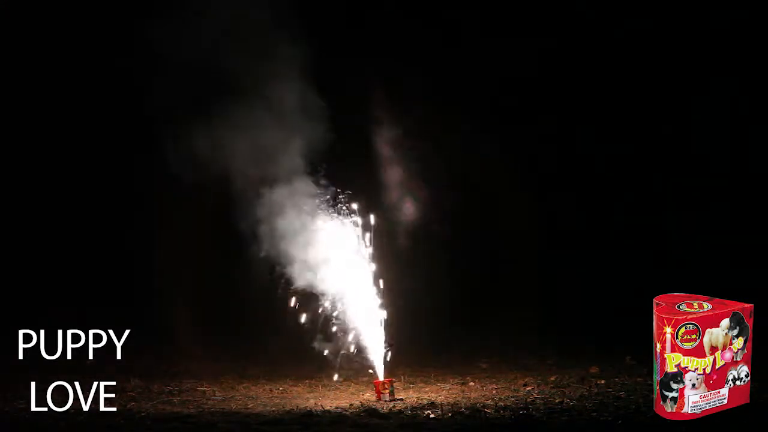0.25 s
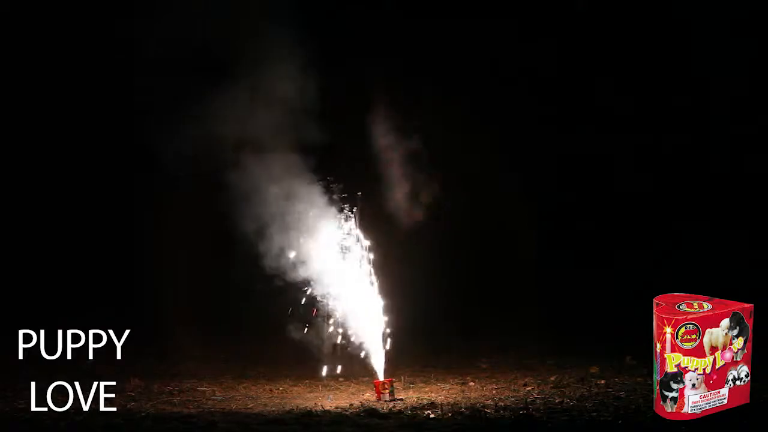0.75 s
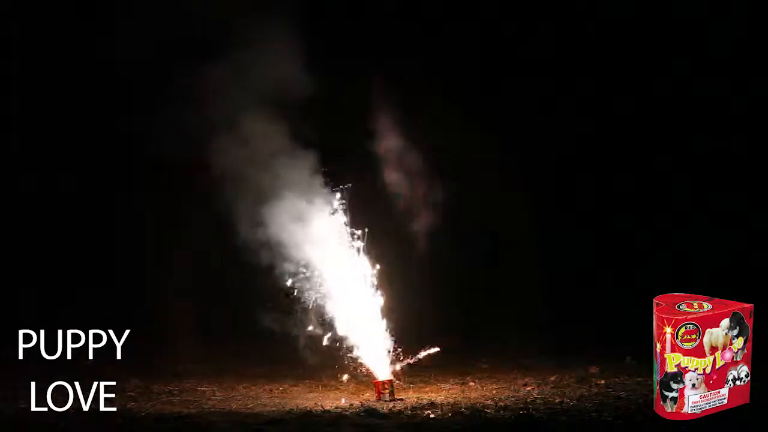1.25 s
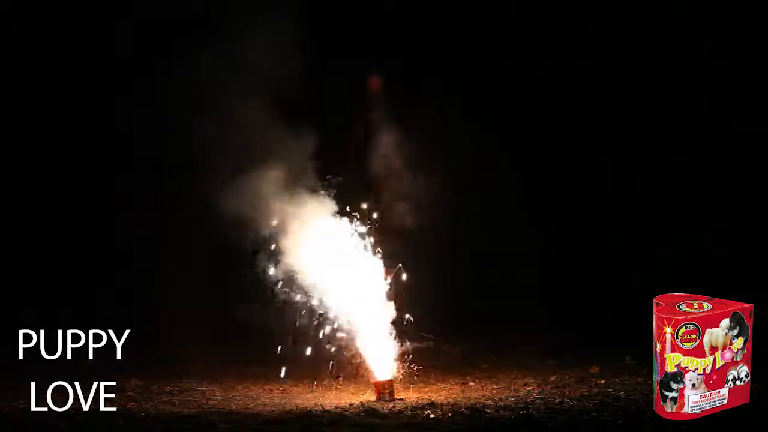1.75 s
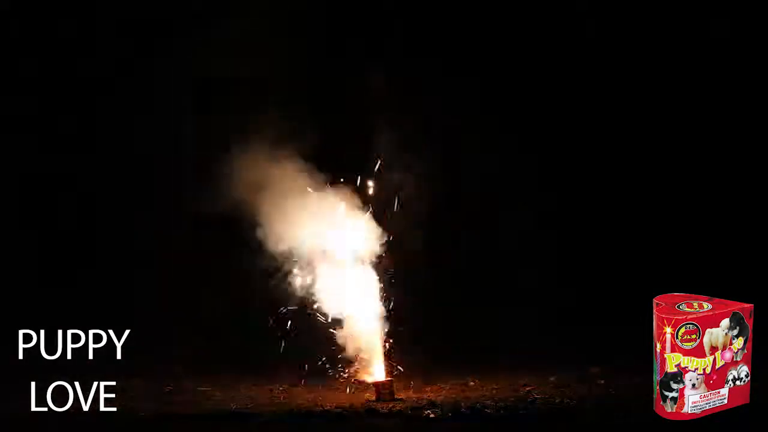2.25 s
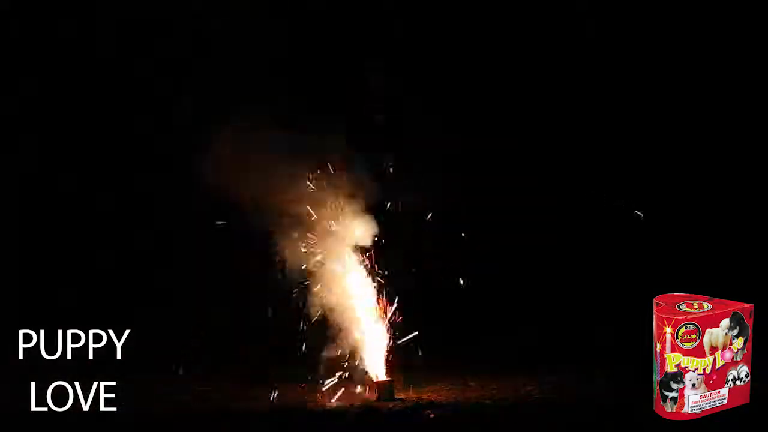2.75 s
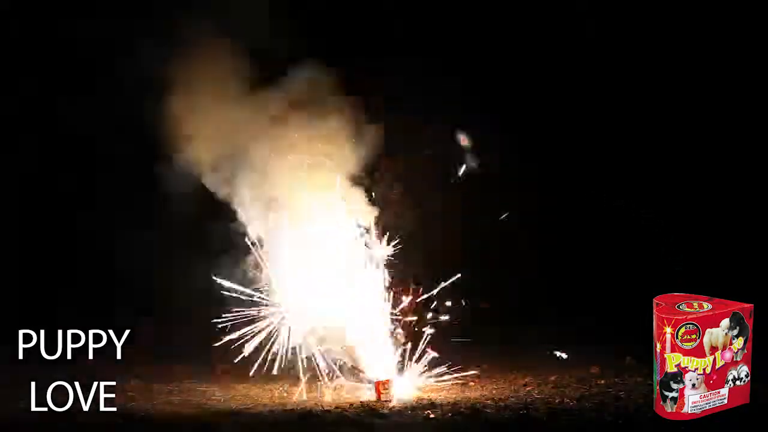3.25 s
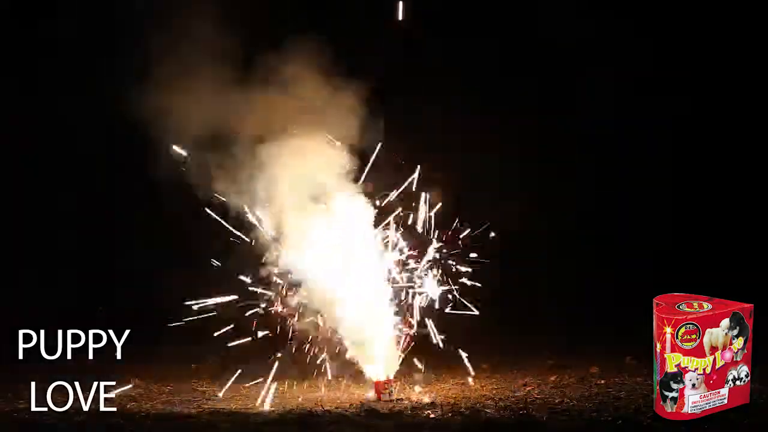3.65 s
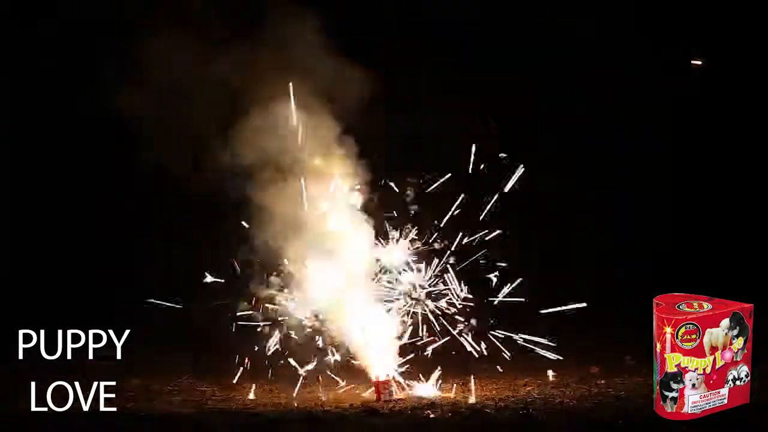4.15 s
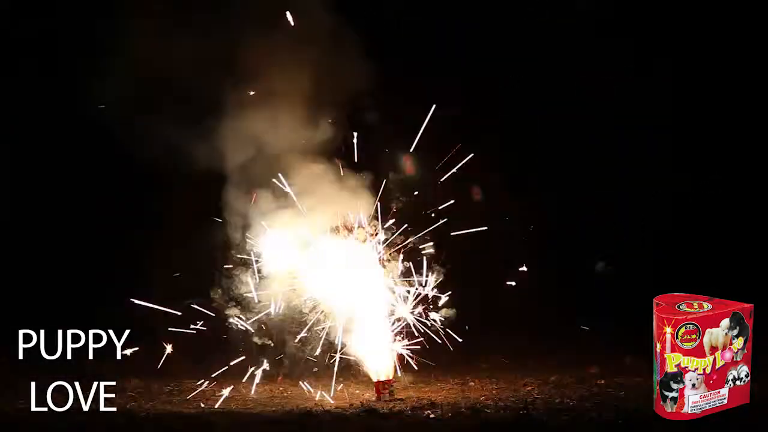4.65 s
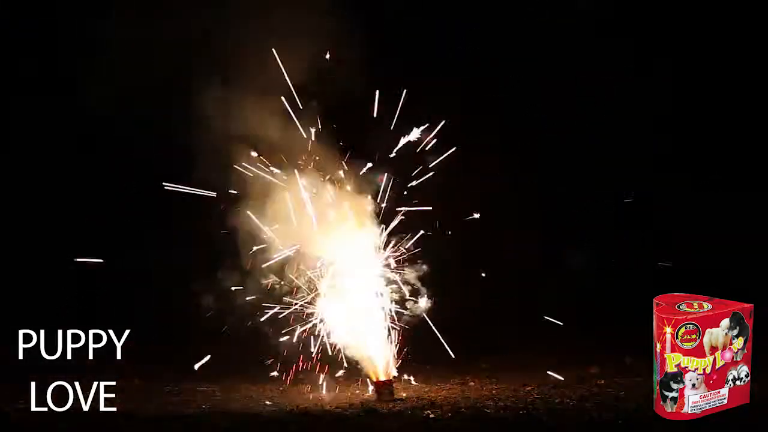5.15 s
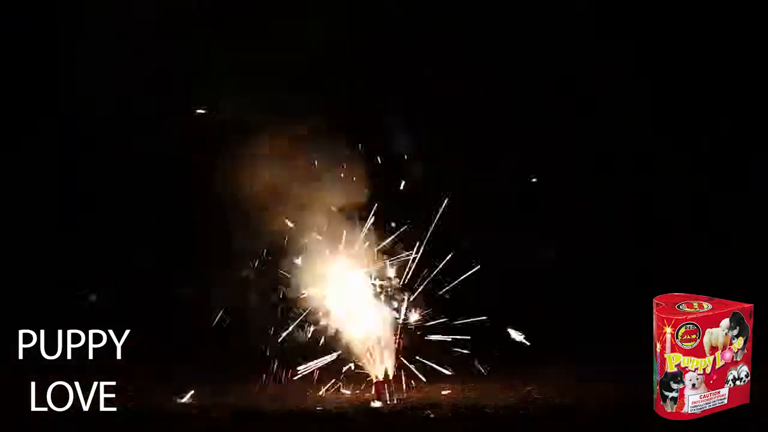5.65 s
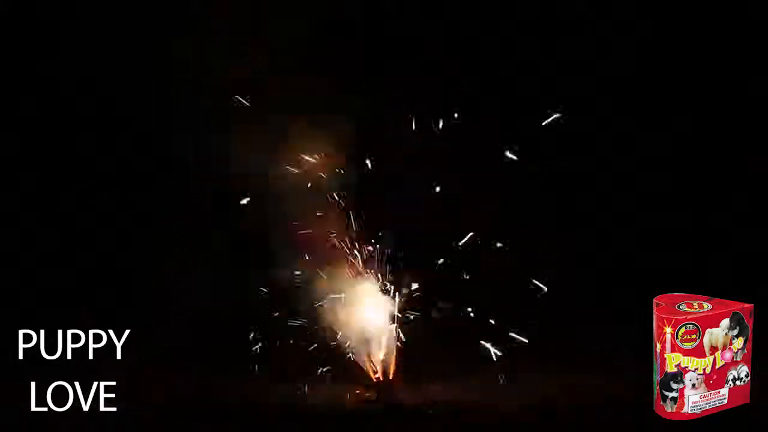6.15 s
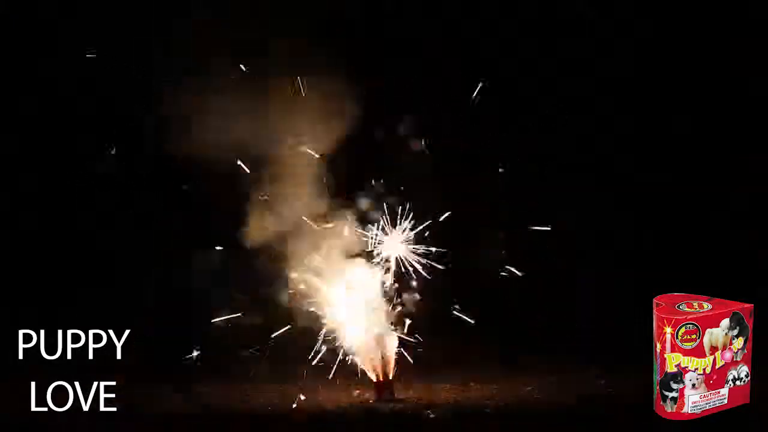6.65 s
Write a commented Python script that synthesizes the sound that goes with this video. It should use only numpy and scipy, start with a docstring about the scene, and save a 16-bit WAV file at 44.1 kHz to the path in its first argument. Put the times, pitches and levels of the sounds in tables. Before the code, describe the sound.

From 0 to 1 second a ground fountain firework hisses steadily, mid-bright and slightly uneven, above a faint low flame roar. At about 1.05 a loud, shrill, raspy whistle starts abruptly near 3.3 kHz and slides down below 2.9 kHz, fading out by 2.3 while the hiss nearly vanishes. Two sharp cracks snap at 2.4. A second whistle swells in at 2.6, around 2.9 kHz, falling to about 2.4 kHz and fading by 4.1; from 3 seconds pops and tiny ticking sparks thicken quickly. From 4.2 the crackle is dense and loud, dry bright snaps in irregular clusters. A quieter third whistle, settling near 2 kHz, runs from 4.5 to 5.37 and ends in a tiny high squeak. Crackling continues unevenly to 6.9. Open outdoor space, short gritty rustles and faint echoes, close microphone clipping slightly on peaks.

```python
"""Fountain firework with whistles and crackle

A fountain firework burns on open ground at night. Three whistle tubes sound in turn, each a sine wave
with overtones that falls in pitch as it burns down; the last dies with a squeak.
Granules burst in the spray as short pulses, each sharp crack followed by its bounce off the ground.
Coloured noise makes the nozzle's hiss and the low flame roar; decaying noise makes the faint echoes.
"""
import sys
import numpy as np
from scipy import signal
from scipy.fft import rfft, irfft, next_fast_len
from scipy.io import wavfile

SR = 44100
rng = np.random.default_rng(int(sys.argv[2]) if len(sys.argv) > 2 else 0)


def wav_out(sig):
    """Save sig, one row per channel (or a flat mono array), as 16-bit PCM at SR to the path in sys.argv[1]."""
    wavfile.write(sys.argv[1], SR, np.round(np.clip(np.atleast_2d(sig).T, -1, 1) * 32767).astype(np.int16))


N = 305172
TIME = np.arange(N) / SR   # seconds

# colour of a crack and of its rustle on the ground: f/Hz, relative level/dB
CRACK_SPECTRUM = [(40, -38.5), (130, -17.5), (290, -13), (430, -15.5), (900, -0.5), (1400, 1), (2600, -2.5),
                  (4300, 0.5), (6200, -5.5), (7500, -9.5), (9200, -18.5), (12500, -18), (16000, -24.5)]


def whistle(start, end, pitch_hz, sag, excess_hz, settle_s, level_db, swell_db, attack_s, burnout_s,
            bend_hz, left, overtone_db, wobble,
            flutter=0.0017, jitter=0.0032, waver_db=0.81, steepening=0.46, rasp_db=2.5):
    """Pulsing combustion drives a pipe whose pitch settles and sags; the harder it burns, the richer its overtones."""
    # overtones at full blast, before each tube's own shift: f/Hz, level against the fundamental/dB
    overtone_spectrum = [(4100, -7), (5000, -13.5), (6100, -20), (7500, -27.5), (9200, -46), (10500, -40.5),
                         (12300, -40.5), (15000, -51.5)]
    chirp_share, chirp_s = .12, .005   # upward flick in pitch at an abrupt start or end
    snuff_s = 0.0071   # the flame goes out
    # a tube that catches abruptly shakes in level and pitch at first
    sputter_db, sputter_share, sputter_s = 4, .012, .025

    on = (TIME > start) & (TIME < end)
    t, to_go = TIME[on] - start, end - TIME[on]
    burnout = np.clip(1 - to_go / burnout_s, 0, 1)   # rises to 1 at the end
    unsettled = np.exp(-t / settle_s)
    abrupt = min(chirp_s / attack_s, 1)
    sputter = abrupt * np.exp(-t / sputter_s) * drift(150)[on]

    flick = abrupt * np.exp(-t / chirp_s) + 2 * left * np.exp(-to_go / chirp_s)
    chirp = sputter_share * sputter + chirp_share * flick
    hz = pitch_hz * (1 - sag * t + chirp) + excess_hz * unsettled + bend_hz * burnout
    # slow to fast unsteadiness, as shares of the pitch
    shake = wobble * unsettled * drift(24)[on] + flutter * drift(68)[on] + jitter * drift(870)[on]
    phase = 2 * np.pi * np.cumsum(hz * (1 + shake)) / SR

    fade_in = np.minimum(t / attack_s, 1)
    fade_down = 1 - (1 - np.clip(left, 0, 1)) * burnout
    envelope = fade_in * fade_down * np.minimum(to_go / snuff_s, 1)
    db = level_db + swell_db * t + 20 * np.log10(envelope + 1e-9)

    blast = from_db(overtone_db + steepening * (db - db.max()))
    rasp = rasp_db * drift(120)[on]   # uneven burning shakes the high overtones most
    wave = np.sin(phase)
    for k in range(2, 8):
        audible = k * hz < SR / 2   # leave out what the sample rate cannot hold
        strength = blast * from_db(np.log(k / 2) * rasp) * gain_at(overtone_spectrum, k * hz)
        wave += audible * strength * np.cos(k * phase)

    out = np.zeros(N)
    out[on] = np.sqrt(2) * wave * from_db(db + waver_db * drift(30)[on] + sputter_db * sputter)
    return out


def crackle(sharp_db=2.5, dull_db=3.0, big_db=-8, chance_db=5, dull_hz=7000):
    """Granules burst sharp or dull; big ones tend to push out the longer, duller pulse."""
    s, db = granules()
    dull = db + chance_db * luck(s) > big_db
    soften = signal.butter(1, dull_hz, fs=SR, output="sos")
    dull_cracks = signal.sosfilt(soften, cracks(s[dull], db[dull] + dull_db))
    return dull_cracks + cracks(s[~dull], db[~dull] + sharp_db)


def granules():
    """Times and levels of all bursts: placed ones, and random ones that go off alone or just after a placed one."""
    # bursts placed one by one, most of them loud: t/s, level before the sharp or dull boost/dB
    placed_bursts = [(2.3818, -3.5), (2.3841, -7.5), (2.4422, -3.5), (2.71, -17.5), (2.8135, -16.5),
                     (2.9604, -5), (2.968, -7.5), (3.0539, -14.5), (3.1238, -6), (3.221, -9.5),
                     (3.3277, -4), (3.351, -7.5), (3.4863, -4.5), (3.588, -8.5), (3.6306, -6),
                     (3.6402, -15), (3.6936, -7), (3.7621, -8.5), (3.8369, -6), (3.8949, -4.5),
                     (3.9838, -10), (4.098, -13.5), (4.144, -6.5), (4.167, -3.5), (4.211, -6.5),
                     (4.254, -9), (4.2884, -4.5), (4.3141, -13), (4.3327, -3.5), (4.4105, -4.5), (4.422, 0),
                     (4.4509, -6), (4.458, -6), (4.4832, -5), (4.5367, -3), (4.5731, -7), (4.6427, -4),
                     (4.7034, -5.5), (4.7504, -0.5), (4.8587, -5), (4.9024, -11), (4.9962, -4), (5.055, -6),
                     (5.0758, -8), (5.1197, -25), (5.1618, -12), (5.2204, -0.5), (5.294, -2.5),
                     (5.3181, -6), (5.3379, -6.5), (5.4222, -6), (5.467, -1), (5.4837, -6), (5.4994, -9),
                     (5.5699, -13.5), (5.6069, -5.5), (5.6193, -5.5), (5.6723, -9), (5.715, -4),
                     (5.7807, -7.5), (5.8141, -7.5), (5.8215, -2), (5.9101, -1), (5.9189, -0.5),
                     (6.0029, -8.5), (6.045, -15), (6.0999, -7.5), (6.1062, -10), (6.1394, -5.5),
                     (6.26, -9.5), (6.2757, -4.5), (6.3202, -5), (6.3334, -7), (6.3497, -5), (6.3623, -3.5),
                     (6.3728, -7), (6.3952, -5.5), (6.412, -10), (6.4242, -10), (6.4574, -4), (6.486, -7.5),
                     (6.5735, -8.5), (6.6112, -3.5), (6.6152, -3), (6.64, -5.5), (6.7006, -16),
                     (6.7436, -6.5), (6.7692, -8), (6.7901, -9.5), (6.8058, -5), (6.8578, -3.5),
                     (6.9087, -8)]
    # random bursts: t/s, lone cracks per second/(1/s) (below 0 means none), cracks set off by each placed burst/count
    random_rates = [(2.9, -5, 0), (3.2, 17, 0.19), (3.7, 40, 0.64), (4.2, 17, 1.2), (5.1, 28.5, 1.5),
                    (5.6, 8, 1.6), (6.92, 0, 1)]
    random_level_db, spread_db = -13.5, 2.5   # level before the same boost, and its scatter
    chain_s = .013   # mean wait between a placed burst and the neighbours that it sets off

    s, db = np.transpose(placed_bursts)
    lone_per_s, set_off = in_time(random_rates)
    r = np.exp(-1 / (chain_s * SR))
    chain = signal.lfilter([1 - r], [1, -r], clicks(s, np.ones(len(s))) + 1e-18)
    born = rng.random(N) < lone_per_s / SR + set_off * chain
    random_db = random_level_db + spread_db * np.clip(rng.standard_normal(N), -2, 2)
    return np.append(s, TIME[born]), np.append(db, random_db[born])


def sparks(spread_db=5):
    """Tiny sparks tick at random throughout the spray."""
    # small sparks: t/s, ticks per second/(1/s), middle level of a tick/dB
    spray = [(1.1, 18, -46), (2.5, 24, -42), (3.4, 100, -21), (5.3, 76, -15), (5.6, 69, -29.5)]
    per_s, db = in_time(spray)
    born = rng.random(N) < per_s / SR
    return cracks(TIME[born], db[born] + spread_db * np.clip(luck(TIME[born]), -2, 2))


def cracks(times, db, bounce=.4, lag_s=.00052, lag_spread=.35):
    """Each crack is followed by its bounce off the ground, the later the higher it bursts."""
    lags = lag_s * np.exp(lag_spread * luck(times))   # random heights
    bursts = clicks(times, from_db(db)) + clicks(times + lags, bounce * from_db(db))
    return signal.oaconvolve(bursts, shock(CRACK_SPECTRUM))[:N]


def shock(spectrum, size=1024):
    """The most abrupt pulse with this spectrum that does not start before its cause; height 1."""
    # folding the cepstrum (spectrum of the log spectrum) packs the energy at the front
    cepstrum = irfft(np.log(gain_at(spectrum, np.fft.rfftfreq(size, 1 / SR))))
    cepstrum[1:size // 2] *= 2
    cepstrum[size // 2 + 1:] = 0
    pulse = notch(irfft(np.exp(rfft(cepstrum))))
    return pulse / pulse.max()


def afterglow(pops, level_db, t60):
    """Rough ground scatters each pop into a dying rustle: fresh noise that follows the pops' power."""
    r = from_db(-120 / (t60 * SR))   # power falls by 60 dB in t60 seconds
    power = signal.lfilter([1 - r], [1, -r], pops ** 2 + 1e-18)
    return from_db(level_db) * np.sqrt(power) * notch(noise(CRACK_SPECTRUM))


def nozzle():
    """The jet hisses unevenly above the roar of the flame; both are coloured noise."""
    # loudness of the gas jet: t/s, hiss level/dB
    jet_level = [(0, -32.5), (.8, -32.5), (.97, -35.5), (1.05, -28), (1.09, -55), (2.24, -49), (2.33, -58),
                 (2.47, -60), (2.55, -49), (3.5, -66), (5.3, -41), (5.55, -56), (6.2, -66)]
    # loudness of the flame: t/s, roar level/dB
    flame_level = [(0, -42), (1.07, -39), (1.13, -64.5), (2.4, -59), (3.5, -57), (6.92, -66.5)]
    # colour of the hiss: f/Hz, relative level/dB
    hiss_spectrum = [(200, -28), (500, -12), (1400, -5.5), (2800, -4.5), (3900, -0.5), (4900, -4.5),
                     (6200, -11), (7500, -17.5), (9000, -26.5), (12500, -27), (16000, -32)]
    # colour of the roar: f/Hz, relative level/dB
    roar_spectrum = [(25, -30.5), (60, -15.5), (140, -3), (310, -0.5), (420, -6.5), (600, -22),
                     (3000, -68.5)]
    sputter_db, lump_db = 1.1, .8   # unevenness of hiss and roar
    hiss_db = in_time(jet_level)[0] + sputter_db * drift(48)
    roar_db = in_time(flame_level)[0] + lump_db * drift(40)
    hiss = from_db(hiss_db) * notch(noise(hiss_spectrum))
    roar = from_db(roar_db) * noise(roar_spectrum)
    return hiss + roar


def surroundings(x):
    """A wall a few metres off and the yard around answer faintly."""
    wall = scatter(x, level_db=-24, delay_s=.02, t60=.02)
    yard = scatter(x, level_db=-23.5, delay_s=0.018, t60=0.24)
    return wall + yard


def scatter(x, level_db, delay_s, t60):
    """Diffuse reflection from a rough surface: late and dying away by 60 dB in t60 seconds."""
    t = TIME[:SR] - delay_s
    response = rng.standard_normal(SR) * (t > 0) * from_db(-60 * np.abs(t) / t60)
    response = response / np.sqrt(np.sum(response ** 2))   # total energy 1
    return from_db(level_db) * signal.oaconvolve(x, response)[:N]


def noise(spectrum):
    """Turbulence of a given colour; rms 1."""
    size = next_fast_len(N)
    white = rfft(rng.standard_normal(size))
    coloured = white * gain_at(spectrum, np.fft.rfftfreq(size, 1 / SR))
    return rms_one(irfft(coloured, size)[:N])


def notch(x, hz=5500):
    """The microphone housing weakens a narrow band."""
    width_hz, depth = 700, .72   # depth 1 would silence the middle of the band
    without_band = signal.lfilter(*signal.iirnotch(hz, hz / width_hz, fs=SR), x)
    return x + depth * (without_band - x)


def drift(rate):
    """Random wander up to about `rate` times a second; spread 1."""
    step = 20   # samples between the points of the wander
    count = N // step + 2
    hz = np.fft.rfftfreq(count, step / SR)
    slow = irfft(rfft(rng.standard_normal(count)) / (1 + (hz / rate) ** 2))
    return np.interp(np.arange(N) / step, np.arange(len(slow)), rms_one(slow))


def luck(times):
    """One random value for each moment; spread 1."""
    return rng.standard_normal(N)[(times * SR).astype(int) % N]


def clicks(times, heights):
    """One impulse at each time."""
    return np.bincount(np.round(np.abs(times) * SR).astype(int), heights, N)[:N]


def in_time(rows):
    """Columns of a curve at every sample, joined by straight lines."""
    s, *columns = np.transpose(rows)
    return [np.interp(TIME, s, c) for c in columns]


def gain_at(spectrum, hz):
    """Gain of a spectrum, read on a log-frequency axis."""
    points_hz, db = np.transpose(spectrum)
    return from_db(np.interp(np.log(hz + 1), np.log(points_hz), db))


def from_db(db):
    """Decibels to an amplitude factor."""
    return 10 ** (np.asarray(db) / 20)


def rms_one(x):
    """Scale a signal to an average strength (rms) of 1."""
    return x / np.sqrt(np.mean(x ** 2) + 1e-20)


def scene():
    """Three tubes, pops with their scatter from gravel and grass, the nozzle and the echoes."""
    # three whistles, then a squeak as the third tube dies: start/s, end/s, pitch/Hz, sag/(share of pitch per s),
    # starting excess/Hz, settling/s, level/dB, swell/(dB per s), attack/s, burn-out/s, burn-out bend/Hz,
    # amplitude left at the end/(0-1), overtone shift/dB, early wobble/(share of pitch)
    whistle_rows = [(1.055, 2.328, 3091, 0.061, 215, 0.33, -12.5, -1.5, 0.0029, 0.15, 49, 0.14, 1.5, .006),
                    (2.62, 4.138, 2612, 0.068, 300.3, 0.18, -13, -2, .16, 0.22, 203, 0.03, 0.5, 0.0078),
                    (4.48, 5.367, 2061, .013, 378.6, .208, -19.5, 2.5, 0.12, .093, -125, .55, 2.5, 0),
                    (5.363, 5.38, 5260, 0, 300, 0.0088, -24, 0, 0.0045, 0.015, 0, 0.04, -7, 0)]
    tubes = sum(whistle(*row) for row in whistle_rows)
    pops = crackle() + sparks()
    # a short rustle and a longer one
    ground = afterglow(pops, level_db=-16, t60=0.015) + afterglow(pops, level_db=-19.5, t60=0.075)
    spill = .35   # the tubes point upward, so less of their sound reaches the wall and yard
    return pops + ground + tubes + nozzle() + surroundings(pops + spill * tubes)


def record(dry):
    """The strongest peaks overload the microphone; the treble is cut steeply at 16 kHz."""
    top, knee = .82, 8   # largest amplitude before the treble cut, and how suddenly it is reached
    rounded = dry / (1 + np.abs(dry / top) ** knee) ** (1 / knee)
    lowpass = signal.firwin(numtaps=255, cutoff=16000, fs=SR)
    return signal.fftconvolve(rounded, lowpass, "same")[None]


dry = scene()
out = record(dry)
wav_out(out)
```